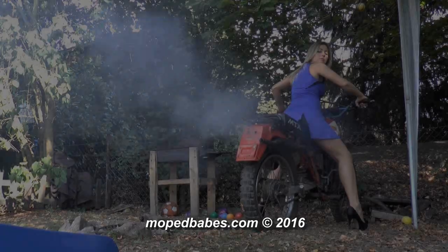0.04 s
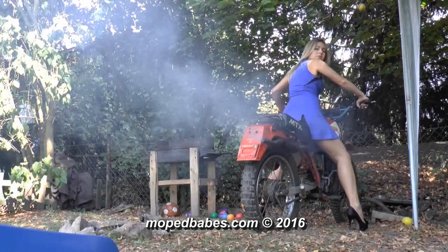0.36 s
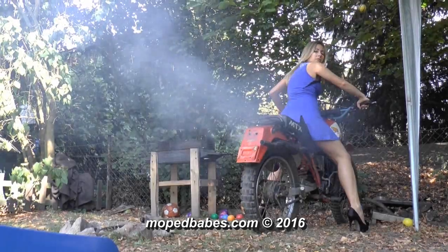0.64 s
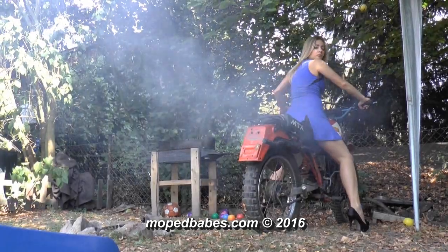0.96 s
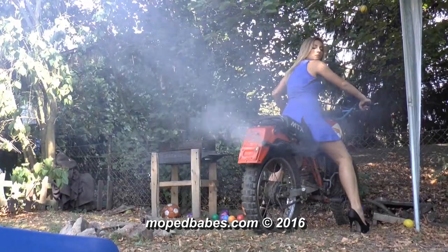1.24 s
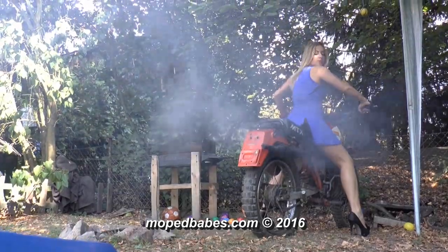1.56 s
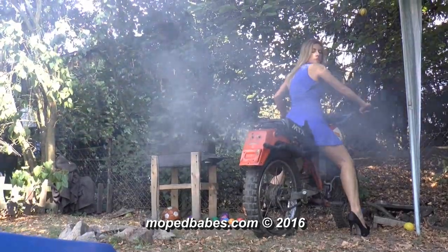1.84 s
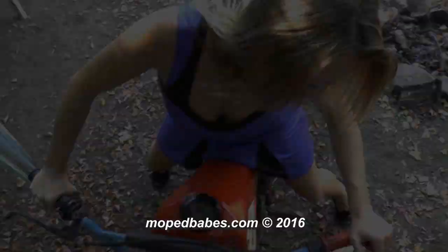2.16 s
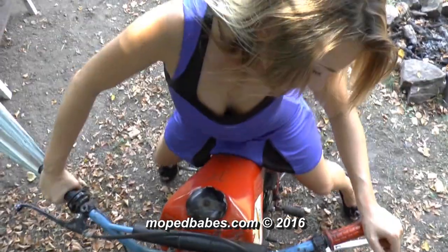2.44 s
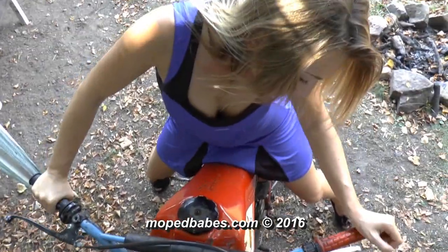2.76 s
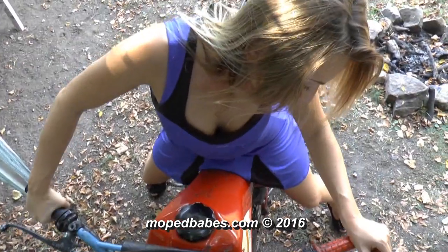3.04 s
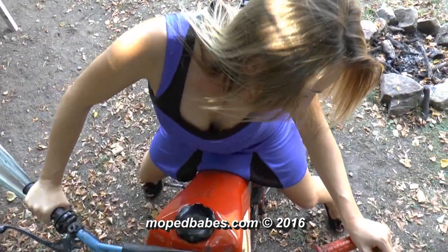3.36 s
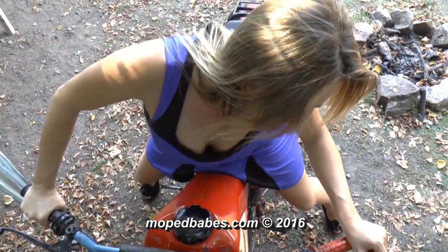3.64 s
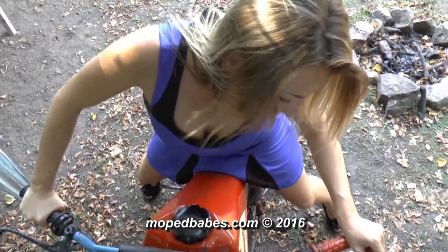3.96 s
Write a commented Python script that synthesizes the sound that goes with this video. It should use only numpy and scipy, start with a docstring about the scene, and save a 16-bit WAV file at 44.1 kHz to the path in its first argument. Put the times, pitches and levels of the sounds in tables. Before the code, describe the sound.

A two-stroke motorcycle sputters and rattles in a garden, its throttle blipped once.

```python
"""A two-stroke dirt bike is revved on its stand in a garden. It fades in from behind: every turn of the
crank thumps and rasps through the exhaust and rattles the engine. It fires only in short bursts, which
crack and ring in the metal, and coasts between them. At 1.2 s the throttle is briefly held open and the
bass of the exhaust thins. By 2.2 s this view has faded out and the front one, from above the
handlebars, fades in, with the engine turning more slowly."""
import sys
import numpy as np
from scipy import signal
from scipy.fft import rfft, irfft
from scipy.io import wavfile

SR = 44100
rng = np.random.default_rng(int(sys.argv[2]) if len(sys.argv) > 2 else 0)


def generate_wav(sig):
    """Save sig (samples, or channels by samples) to the path in sys.argv[1] as 16-bit PCM at SR."""
    pcm = np.round(np.clip(np.atleast_2d(sig).T, -1, 1) * 32767).astype(np.int16)
    wavfile.write(sys.argv[1], SR, pcm)


N = 176400

# the one moment of open throttle: t/s, opening/0-1
THROTTLE = [(1.2, 0), (1.25, 1), (1.34, 1), (1.41, 0)]


def undb(db):
    """Decibels to gain."""
    return 10 ** (np.asarray(db) / 20)


def level(x, db):
    """Set the rms level."""
    return x * undb(db) / np.sqrt(np.mean(x ** 2) + 1e-20)


def curve(rows, t):
    """Read an envelope of (t/s, value) at the times t."""
    return np.interp(t, *np.array(rows, float).T)


def convolve(x, response):
    """Pass x through a response; either may be stereo."""
    return signal.fftconvolve(np.atleast_2d(x), np.atleast_2d(response), axes=1)[:, :N]


def colour(x, points, skirt_db=0):
    """Minimum-phase EQ through (f/Hz, level/dB) points, falling by skirt_db an octave outside them."""
    hz, db = np.array(points, float).T
    size = 4096
    octave = np.log2(np.maximum(np.arange(size // 2 + 1) * SR / size, 1))
    knots = np.log2(hz)
    gain_db = np.interp(octave, knots, db) - skirt_db * abs(octave - np.clip(octave, knots[0], knots[-1]))
    cepstrum = irfft(np.log(undb(gain_db) + 1e-5))
    cepstrum[1:size // 2] *= 2
    cepstrum[size // 2 + 1:] = 0
    return convolve(x, irfft(np.exp(rfft(cepstrum))))


def decay(seconds):
    """An exponential tail with the given time constant."""
    return np.exp(-np.arange(SR // 4) / SR / seconds)


def spread(pair):
    """Two unrelated signals as mid and side: narrow in the midrange, wider in bass and treble."""
    # side against mid: f/Hz, level/dB
    side_eq = [(100, -1), (300, -29), (700, -23), (1500, -30), (3000, -18), (5000, -3.5), (9000, -7.5),
               (13000, -20)]
    return pair[0] + colour(pair[1], side_eq) * np.array([[1], [-1]])


def pulses(times, sizes):
    """One band-limited click at each time."""
    out = np.zeros(N)
    at = times[:, None] * SR
    taps = at.astype(int) + np.arange(-7, 9)
    clicks = sizes[:, None] * np.sinc(taps - at) * np.sinc((taps - at) / 8)
    np.add.at(out, np.clip(taps, 0, N - 1), clicks)
    return out


def puffs(clicks, seconds):
    """A dying puff of noise after each click, in two unrelated versions."""
    return convolve(clicks, decay(seconds)) * rng.standard_normal((2, N))


def outdoor_air():
    """A faint bed of air, mostly low rumble."""
    # noise spectrum: f/Hz, level/dB
    air_eq = [(20, -11), (60, 1), (150, -28), (400, -17), (2000, -34), (15000, -50)]
    return colour(rng.standard_normal((2, N)), air_eq)


def garden(x, decay_s=0.028, wet_db=-4.5):
    """Add short scatter from ground, fence and leaves, with little bass."""
    tail = decay(decay_s) * rng.standard_normal((2, SR // 4))
    tail /= np.sqrt(np.sum(tail ** 2, axis=1, keepdims=True))
    return x + undb(wet_db) * colour(convolve(x, tail), [(300, -9), (1000, -3), (4000, 0), (12000, -3)])


def pipe_smear(x, seconds):
    """The pipe disperses each pulse: its overtones arrive later than its bass."""
    hz = np.arange(N // 2 + 1) * SR / N
    delay = seconds * hz / (hz + 600)
    return irfft(rfft(x) * np.exp(-2j * np.pi * np.cumsum(delay) * SR / N), N)


def exhaust_rasp(times, scatter_db, view, open_db=5):
    """The upper overtones of the exhaust pulses, a rasp that swells and ebbs."""
    # rasp envelope: t/s, level/dB
    envelope = [(0, 2.5), (.38, 1.5), (.6, -0.5), (.8, 4), (.93, 6), (1.05, 6), (1.18, 5.5), (1.27, -4.5),
                (1.38, 1.5), (1.5, 2.5), (1.7, 1), (1.87, 6), (2.03, 3.5), (2.4, -5), (2.77, -8),
                (3.05, 2.5), (3.3, -4.5), (3.55, -5), (3.78, 2), (4, -0.5)]
    # rasp tone in each view: f/Hz, level/dB
    rear_eq = [(650, -14), (760, -3.5), (860, 11), (1010, -5), (1150, -3.5), (1300, 1.5), (1550, -5),
               (1850, -2), (2100, -10), (2400, 0.5), (3500, -17)]
    front_eq = [(650, -12), (740, -7), (835, 10), (920, -6), (1020, 0), (1120, -13), (1250, -5),
                (1450, -16), (1750, -11.5), (3000, -15.5)]
    sizes = undb(curve(envelope, times) + open_db * curve(THROTTLE, times) + scatter_db)
    pressure = pipe_smear(pulses(times, sizes), 2 * view["smear_s"])
    return colour(pressure, rear_eq if view["rear"] else front_eq, skirt_db=34)


def exhaust_thump(times, scatter_db, view):
    """One pressure pulse a turn through the pipe, thinner in the bass while the throttle is open."""
    # thump envelope: t/s, level/dB
    envelope = [(0, -1), (.2, 0), (.42, 4.5), (.6, -1.5), (.8, -0.5), (1.0, 1), (1.2, -3.5), (1.42, 1),
                (1.55, -1.5), (1.85, 2.5), (2.1, -0.5), (2.5, -3), (2.77, -3), (3.05, 0.5), (3.3, -1.5),
                (3.5, -1.5), (3.78, 0.5), (4, -3.5)]
    # pipe tone in each view, and the extra EQ at open throttle: f/Hz, level/dB
    rear_eq = [(110, -28), (165, -11), (210, -5.5), (255, -7), (310, -10), (360, -2), (420, 0.5), (465, 7),
               (530, -3.5), (600, -13.5), (750, -14.5)]
    front_eq = [(80, -40), (160, -29), (245, -17.5), (315, -2), (410, 4), (490, 2), (580, -4), (660, -5),
                (760, -16.5)]
    open_eq = [(220, -25), (310, 13), (450, -3), (700, -3)]
    sizes = undb(curve(envelope, times) + scatter_db)
    pressure = pipe_smear(pulses(times, sizes), view["smear_s"])
    thump = colour(pressure, rear_eq if view["rear"] else front_eq, skirt_db=16.5)
    opening = curve(THROTTLE, np.arange(N) / SR)
    return (1 - opening) * thump + opening * colour(thump, open_eq)


def metal_ring(blast, view):
    """Pipe and cylinder ring when a firing strikes them."""
    # metal modes in each view: f/Hz, bandwidth/Hz, level/dB
    rear_modes = [(865, 59, -4), (1223, 57, -2.5), (1830, 110, -19), (3150, 36, 5), (4716, 91, -3),
                  (5770, 350, -8), (7580, 190, -11.5)]
    front_modes = [(840, 60, -7), (1020, 70, -9), (1590, 80, -7), (3085, 60, 9), (4680, 130, -6),
                   (5770, 200, -12)]
    t = np.arange(SR // 10) / SR
    ring = sum(undb(db) * width * np.exp(-np.pi * width * t) * np.cos(2 * np.pi * hz * t)
               for hz, width, db in (rear_modes if view["rear"] else front_modes))
    return convolve(blast, ring)


def combustion(times, scatter_db, view, attack_s=0.006, release_s=0.0045):
    """Each turn within a burst fires: a click and a puff of noise that crack and ring the metal."""
    # bursts of firing: t/s, length/s, level/dB
    bursts = [(.003, 0.059, -1.5), (0.112, 0.019, 0), (0.208, 0.015, -0.5), (0.307, 0.013, 0.5),
              (0.386, 0.038, -1.5), (0.48, 0.037, 1), (.608, 0.021, 3), (0.742, 0.03, 1.5),
              (0.793, 0.098, -6.5), (0.902, 0.027, 0.5), (1.074, 0.022, 2), (1.205, 0.2, 0.5),
              (1.53, 0.041, 0.5), (1.694, 0.056, -0.5), (1.792, 0.056, -3.5), (1.865, 0.031, 2),
              (2.016, 0.016, 2), (2.095, 0.032, 3), (2.226, .17, -2.5), (2.485, 0.033, -1),
              (2.643, 0.032, 1.5), (2.79, 0.16, -0.5), (2.967, 0.094, -3), (3.174, 0.041, 0),
              (3.369, 0.028, -1), (3.511, 0.046, 1), (3.606, 0.2, -2.5), (3.952, .06, -0.5)]
    # crack tone in each view: f/Hz, level/dB
    rear_eq = [(40, -44), (150, -23), (400, 6), (650, -6.5), (900, 1.5), (2000, 2.5), (3800, 3), (5400, 7),
               (6900, -8.5), (9000, -4.5), (13000, -4), (15500, -16)]
    front_eq = [(40, -24), (150, -27), (350, -17), (700, 9.5), (1000, 9.5), (2000, 1), (3800, -2.5),
                (5400, 3), (6900, -6), (9000, -14), (13000, -10), (15500, -21)]
    strength = np.zeros(len(times))
    for start, length, db in bursts:
        attack = np.clip(1 + (times - start) / attack_s, 0, 1)
        release = np.exp(-np.maximum(times - start - length, 0) / release_s)
        strength += undb(db + scatter_db) * attack * release
    bangs = pulses(times, strength)
    blast = spread(level(puffs(bangs, view["crack_s"]), 0)) + level(bangs, view["click_db"])
    crack = colour(blast, rear_eq if view["rear"] else front_eq)
    return level(crack, view["crack_db"]) + level(metal_ring(blast, view), view["ring_db"])


def engine_rattle(times, scatter_db, view, open_db=-3):
    """The same clatter of parts each turn plus a fresh hiss of gas, both softer at open throttle."""
    # rattle envelope: t/s, level/dB
    envelope = [(0, 2), (.42, 2.5), (.58, 0), (.88, 4), (1.02, 1), (1.17, 1), (1.35, -2), (1.5, 1),
                (1.65, 2), (1.85, 3), (2.0, 2), (2.3, -1), (2.75, 1), (3.1, 0), (3.45, 0.5), (3.85, -1),
                (4, 2)]
    # tone of clatter and hiss in each view: f/Hz, level/dB
    rear_eq = [(300, -4), (480, -11), (700, -3.5), (860, -6.5), (1400, 3), (2000, 2.5), (2400, 2),
               (3600, -2.5), (4700, -2.5), (6800, -9), (8300, -6.5), (11000, -15), (14000, -16.5),
               (15500, -26)]
    front_eq = [(280, 2.5), (450, 8), (720, -5), (850, 3), (1450, -0.5), (1700, 3.5), (2000, -1.5),
                (2350, 0.5), (3900, -7), (4600, -4.5), (6000, -12), (8300, -5), (11000, -15.5),
                (15500, -25)]
    knocks = pulses(times, undb(curve(envelope, times) + open_db * curve(THROTTLE, times) + scatter_db))
    parts = decay(view["clatter_s"]) * rng.standard_normal((2, SR // 4))
    clatter = level(convolve(knocks, parts), view["clatter_db"])
    hiss = level(puffs(knocks, view["gas_s"]), 0)
    return colour(spread(clatter + hiss), rear_eq if view["rear"] else front_eq, skirt_db=24.5)


def dirt_bike(speed, fade, view, jitter_s=0.00003):
    """One view of the bike over the air bed: each crank turn triggers the layers, a little unevenly."""
    t = np.arange(N) / SR
    turns = np.cumsum(curve(speed, t)) / SR
    times = np.interp(np.arange(1, int(turns[-1])), turns, t)
    chance = rng.standard_normal((N // 200, 4))[:len(times)]
    heard = (times > fade[0][0]) & (times < fade[-1][0])
    timing, weight, roughness, force = chance[heard].T
    times = times[heard] + jitter_s * timing
    mix = level(exhaust_thump(times, 0.96 * weight, view), view["thump_db"])
    mix = mix + level(exhaust_rasp(times, 0.96 * roughness, view), view["rasp_db"])
    mix = mix + level(engine_rattle(times, 2.1 * roughness, view), view["rattle_db"])
    mix += combustion(times, -0.43 * force, view)
    mix += level(outdoor_air(), -73)
    pan = undb(np.array([[1], [-1]]) * view["pan_db"] / 2)
    return mix * curve(fade, t) * pan


def scene():
    """The bike in the garden, from behind and then from above the handlebars."""
    # crank speed: t/s, turns per second/Hz
    rear_speed = [(0.0, 129.1), (0.08, 129.6), (0.18, 128.2), (0.25, 124.7), (0.53, 117.3), (0.67, 115.5),
                  (0.73, 113.0), (0.76, 113.2), (1.17, 102.4), (1.2, 100.8), (1.24, 103.6), (1.33, 113.6),
                  (1.41, 119.6), (1.63, 115.4), (1.68, 113.3), (2.0, 105.5), (2.09, 104.5), (2.18, 105.1)]
    front_speed = [(2.23, 72.7), (2.352, 79.0), (2.412, 80.0), (2.47, 78.3), (2.524, 78.6), (2.634, 76.4),
                   (2.712, 76.7), (2.796, 74.9), (3.004, 82.9), (3.078, 84.3), (3.166, 81.3), (3.24, 81.9),
                   (3.362, 78.6), (3.436, 79.1), (3.502, 76.4), (3.762, 84.1), (3.812, 84.3), (4.0, 80.3)]
    # fader moves: t/s, gain
    rear_fade = [(0, 0.074), (.1, 0.23), (.25, 0.7), (.4, 1), (1.92, 0.92), (2.05, 0.69), (2.14, 0.23),
                 (2.2, 0.012), (2.22, 0)]
    front_fade = [(2.19, 0), (2.23, 0.13), (2.35, 0.53), (2.5, 1), (4, 0.98)]
    # clatter_db is against the gas hiss, click_db against the firing's puff, pan_db left minus right
    rear = dict(rear=True, thump_db=-33.5, rasp_db=-32.5, rattle_db=-28.5, crack_db=-32, ring_db=-31,
                clatter_db=-2, click_db=-4.5, pan_db=-0.16,
                clatter_s=0.025, gas_s=0.04, crack_s=0.0077, smear_s=0.009)
    front = dict(rear=False, thump_db=-32, rasp_db=-33.5, rattle_db=-29.5, crack_db=-34.5, ring_db=-32,
                 clatter_db=1, click_db=-11.5, pan_db=1.14,
                 clatter_s=0.026, gas_s=0.064, crack_s=0.012, smear_s=0.014)
    return garden(dirt_bike(rear_speed, rear_fade, rear) + dirt_bike(front_speed, front_fade, front))


def record(dry):
    """Sound reaches the right microphone a sample late; the treble is cut steeply above 15.7 kHz."""
    pair = np.array([dry[0], np.r_[0, dry[1, :-1]]])
    return signal.sosfilt(signal.ellip(12, .2, 80, 15700, fs=SR, output="sos"), pair)


dry = scene()
out = record(dry)
generate_wav(out)
```